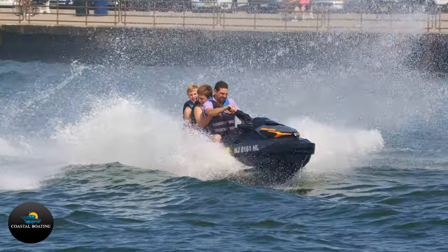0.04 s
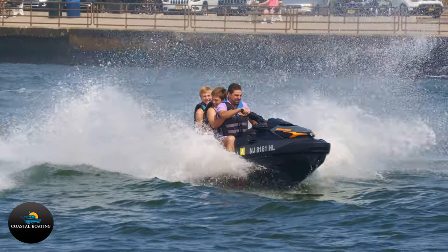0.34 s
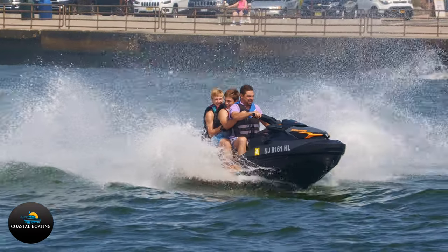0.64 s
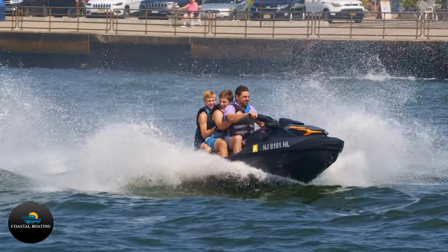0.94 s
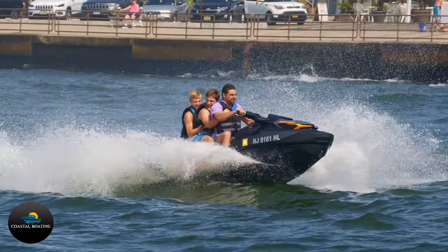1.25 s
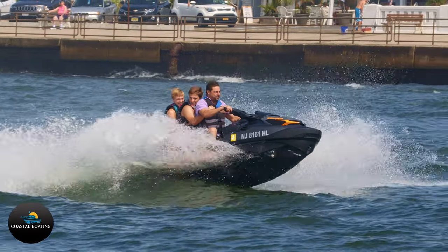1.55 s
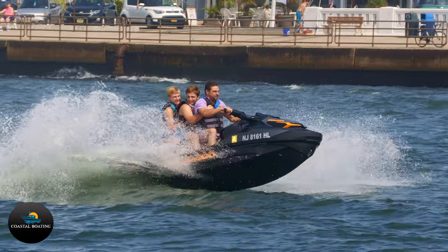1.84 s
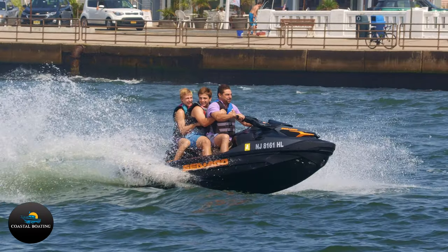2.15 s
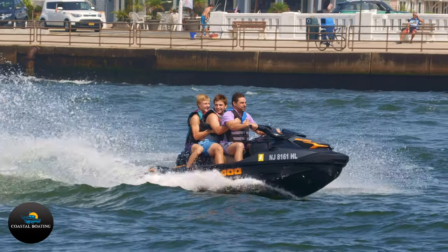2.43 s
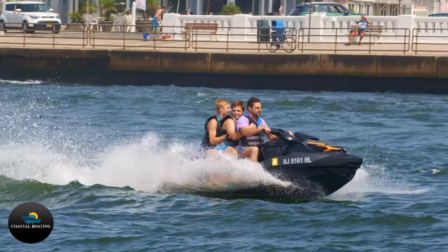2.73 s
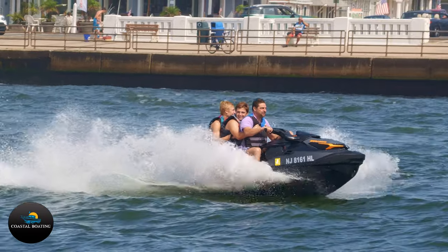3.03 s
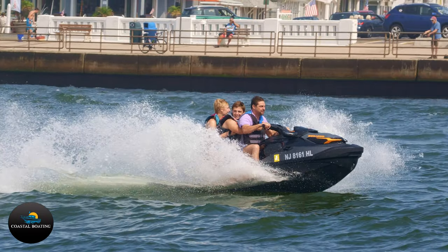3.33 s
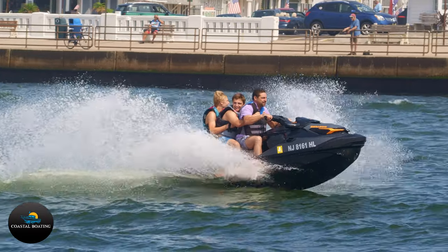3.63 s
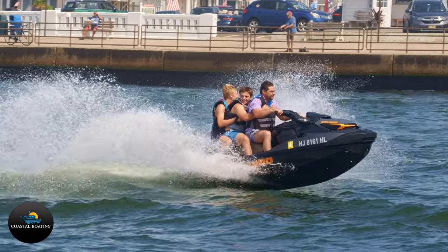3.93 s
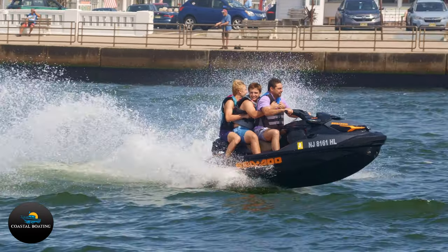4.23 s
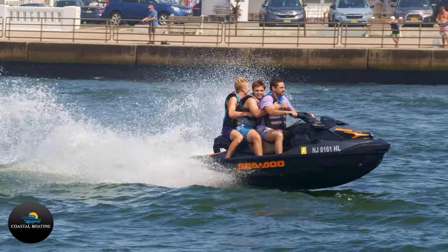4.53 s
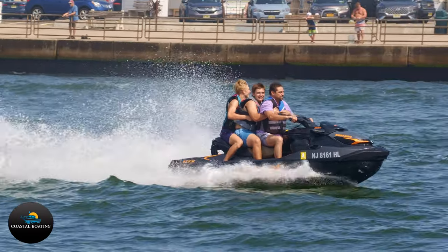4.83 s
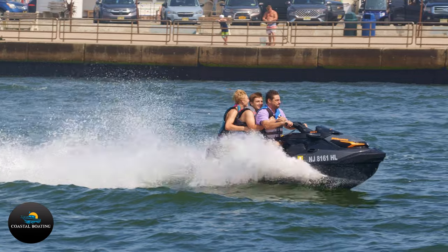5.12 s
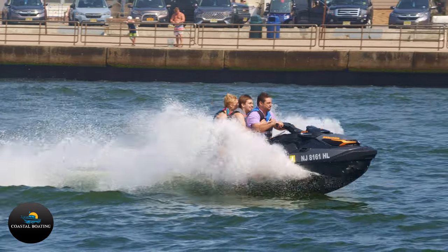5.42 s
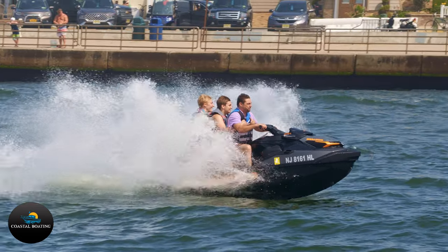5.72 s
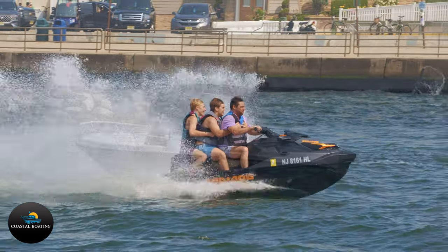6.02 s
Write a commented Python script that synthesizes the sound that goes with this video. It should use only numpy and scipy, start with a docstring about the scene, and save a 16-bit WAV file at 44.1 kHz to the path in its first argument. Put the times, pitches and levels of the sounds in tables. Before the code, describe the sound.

A personal watercraft runs along a choppy waterway, heard from the shore some way off. From the start there is a low engine drone, an uneven underwater exhaust burble and the rush of the wake, with a light hiss of spray. The engine tone comes forward at about 1.2 seconds, then swells and dips as the water surges with each wave. Its pitch creeps upward until about 5.5 seconds and sags slightly afterwards. A dull hull splash lands near 2.7 seconds. From about 3 seconds the spray becomes a louder, brighter hiss and patter. Between 3.4 and 5.3 seconds falling water makes scattered short, sharp slaps, while the hull hits the chop near 3.6 seconds and several times around 4.9 to 5.2. The drone and rushing spray continue to the end, just after 6 seconds.

```python
"""The three-cylinder engine of a personal watercraft drones along a choppy waterway, some way off.
It sounds at the crank rate and its overtones, at the firing rate and at half the firing rate, and each
firing excites resonances of hull and pump. Exhaust gas burbles out under water, and the turbulent wake
adds a low rush. The hull throws sheets of spray, whose many drop impacts brighten into a hiss and
patter; larger lumps land with a few sharp slaps, and the hull slams into the chop with duller splashes."""
import sys
import numpy as np
from scipy import signal
from scipy.fft import rfft, irfft, next_fast_len
from scipy.io import wavfile

SR = 44100
rng = np.random.default_rng(int(sys.argv[2]) if len(sys.argv) > 2 else 0)


def file_out(sig):
    """Save sig as 16-bit WAV at sys.argv[1]."""
    # one column per channel
    cols = np.atleast_2d(sig).T
    # limit, then scale
    lim = np.clip(cols, -1, 1)
    pcm = np.round(lim * 32767).astype(np.int16)
    wavfile.write(sys.argv[1], SR, pcm)


N = 271952
TIME = np.arange(N) / SR

# engine speed, rising and sagging as the hull rides the chop: time_s, rotation_hz
CRANK_SPEED = [(0, 79), (1.25, 75), (1.6, 78.6), (2.05, 78.8), (2.3, 81.4), (3.25, 84.7), (4.1, 82.3),
               (4.55, 85.2), (5.2, 86.5), (5.55, 88.7), (6.17, 81.5)]
# tone at the crank rate: time_s, level_db
CRANK_LEVEL = [(0, -42.5), (1.05, -40.5), (1.26, -23.5), (2.05, -25), (2.3, -37), (2.5, -23), (2.77, -23),
               (3.02, -43), (3.7, -42.5), (4.15, -22.5), (4.32, -33), (4.52, -18.5), (4.85, -28.5),
               (5.2, -26.5), (5.7, -35), (6.03, -22), (6.17, -32)]
# tone at the firing rate: time_s, level_db
FIRING_LEVEL = [(0, -41), (1.02, -44.5), (1.42, -28.5), (2.05, -34), (2.3, -22.5), (2.55, -26), (2.75, -37),
                (3.2, -30.5), (5.0, -28.5), (5.27, -35), (5.56, -23.5), (6.17, -35.5)]
# overtones, relative to the crank tone: harmonic_number, level_db
CRANK_HARMONICS = [(2, -13.5), (3, -21)]
# resonances of hull and jet pump: centre_hz, bandwidth_hz, level_db
HULL_RESONANCES = [(688.5, 120, -45), (1658, 220, -54)]
# exhaust gas burbling under water: time_s, level_db
BURBLE_LEVEL = [(0, -24), (0.22, -28.5), (0.65, -26.5), (1.0, -32), (1.2, -24), (1.9, -28), (2.3, -24),
                (3.05, -25.5), (3.42, -23), (3.75, -29), (5.1, -22.5), (6.17, -25.5)]
# amount of spray, of which only the swing about the mean counts: time_s, level_db
SPRAY_AMOUNT = [(0, -49), (0.8, -52), (1.8, -49.5), (2.5, -50.5), (3.25, -44), (3.8, -43), (5.2, -44),
                (5.4, -42), (6.17, -46.3)]
# spectral shapes of the four water noises: frequency_hz, relative_density_db
BURBLE_SPECTRUM = [(20, -28.5), (36, -22.5), (48, -9.5), (60, -8), (75, -2.5), (100, 2.5), (120, 0),
                   (145, -4), (185, -9.5), (260, -27.5), (400, -50)]
CHURN_SPECTRUM = [(60, -32), (110, -11), (170, 2), (250, 1), (350, -1.5), (500, -5), (700, -9), (900, -14),
                  (1300, -18.5), (2500, -33), (5000, -55.5)]
SHEET_SPECTRUM = [(200, -33.5), (500, -11.5), (850, 1.5), (1100, 1), (1600, -1), (2200, -2.5), (3000, -7),
                  (4200, -17), (7000, -40.5), (9000, -53)]
MIST_SPECTRUM = [(900, -30.5), (2200, -7.5), (3000, -2.5), (3600, -0.5), (4300, 0), (5000, -2.5),
                 (6000, -6.5), (7000, -10.5), (8000, -14), (8500, -17), (9000, -32.5)]
# waves the hull ploughs through: crest_s, half_height_width_s, churn_rise_db, sheet_rise_db
WAVE_CRESTS = [(1.445, 0.36, 4, -0.5), (1.823, .25, -0.5, 1.5), (2.374, 0.11, 4.5, -0.5),
               (2.76, 0.33, 3.5, 3), (3.418, 0.72, 3, 2), (4.263, 0.15, 2, .5), (4.673, 0.31, 3, 1.3),
               (5.01, 0.23, 5, 2.5), (5.426, 0.33, 4, 0), (6.076, 0.45, 3, 1)]
# big lumps of spray striking the surface: start_s, level_db, pitch_hz
BIG_SLAPS = [(3.716, -20, 1400), (3.742, -17, 1500), (3.760, -20.5, 1700), (3.804, -22, 2800),
             (3.826, -23, 1700), (4.0045, -16.5, 1500), (4.011, -18.5, 2200), (4.036, -23.5, 1900),
             (4.143, -24, 1900), (4.2722, -20.5, 2500), (4.409, -22.5, 2160), (4.424, -23, 1900),
             (4.762, -19, 1700), (5.141, -24.5, 1500)]
# the hull striking the chop: start_s, level_db, pitch_hz, decay_s
HULL_SLAMS = [(2.747, -16.5, 294, 0.0086), (3.566, -20, 1250, 0.017), (4.901, -23, 650, 0.0077),
              (4.942, -16.5, 1050, 0.0065), (4.986, -17.5, 950, 0.019), (5.243, -19.5, 1150, 0.0136)]
# narrow bands that colour all the water noise: centre_hz, bandwidth_hz, gain_db
WATER_BANDS = [(706, 87, -0.5), (1660, 120, 1), (2726, 83, 2.5), (3490, 73, 4)]

# base levels, and the share of the spray's swing (in dB) that each follows
CHURN_DB, CHURN_FOLLOWS = -30.5, 0.16
SHEET_DB, SHEET_FOLLOWS = -40.5, 0.83
MIST_DB = -49   # follows the whole swing
HALF_FIRING_DB, HALF_FIRING_FOLLOWS = -35, 0.39   # follows the firing tone's swing instead
SMALL_SLAPS_PER_S, SMALL_SLAP_DB, SMALL_SLAP_SPREAD_DB, SMALL_SLAP_HZ = 9.6, -29, 0.5, 2100
SLAP_DECAY_S, SLAP_DECAY_EXPONENT = 0.0013, 0.5   # decay at the mean level; its growth with amplitude


def engine_drone(crank_phase, firing_phase):
    """Periodic rotation and firing radiate tones, modulated as the exhaust outlet dips in the chop."""
    def tone(phase, level_db, flutter_db, wobble_rad):
        """One engine order under random amplitude and phase modulation."""
        amplitude = np.sqrt(2) * from_db(level_db + flutter_db * fluctuation(6.1))
        return amplitude * np.sin(phase + wobble_rad * fluctuation(7.2))

    crank_db = sampled(CRANK_LEVEL)
    half_firing_db = HALF_FIRING_DB + HALF_FIRING_FOLLOWS * swing(FIRING_LEVEL)
    drone = tone(firing_phase / 2, half_firing_db, flutter_db=2.5, wobble_rad=0.27)
    drone += tone(crank_phase, crank_db, flutter_db=-0.3, wobble_rad=0.14)
    drone += tone(firing_phase, sampled(FIRING_LEVEL), flutter_db=1.5, wobble_rad=0.052)
    for harmonic, relative_db in CRANK_HARMONICS:
        drone += tone(harmonic * crank_phase, crank_db + relative_db, flutter_db=1.0, wobble_rad=0.12)
    return drone


def hull_growl(firing_phase):
    """Forced resonance: each firing drives hull and pump with a burst of noise."""
    bursts = turbulence() * (1 + 0.97 * np.cos(firing_phase))
    return sum(from_db(level_db) * rms_one(band_pass(bursts, hz - width_hz / 2, hz + width_hz / 2))
               for hz, width_hz, level_db in HULL_RESONANCES)


def exhaust_burble():
    """Bubble noise: gas bursting out under water radiates an uneven, low rumble."""
    bubbling = shape_spectrum(turbulence(), BURBLE_SPECTRUM, flutter_db=2.0, flutter_hz=2.7)
    return from_db(sampled(BURBLE_LEVEL)) * bubbling


def wake_churn(firing_phase, spray_db, surge_db):
    """Turbulence from jet and hull gives broadband noise, pulsing a little with each firing."""
    level_db = CHURN_DB + CHURN_FOLLOWS * spray_db + surge_db
    rush = shape_spectrum(turbulence(), CHURN_SPECTRUM, flutter_db=1.07, flutter_hz=12)
    return from_db(level_db) * rush * (1 + 0.19 * np.cos(firing_phase))


def falling_spray(spray_db, surge_db):
    """Drop impacts superpose into noise; the denser the spray, the more single drops stand out."""
    grain = np.clip(0.65 + 0.045 * spray_db, 0, .95)

    def patter(per_s, spread_db=3.0):
        """Shot noise of near drops, many small and a few large, over the hiss of countless far ones."""
        sizes = from_db(spread_db * np.minimum(rng.exponential(1, N), 4))
        signs = rng.choice([-1, 1], N)
        landings = rng.random(N) < per_s / SR
        return grain * rms_one(sizes * signs * landings) + np.sqrt(1 - grain ** 2) * turbulence()

    clumps = from_db(0.64 * fluctuation(39))   # water lands in clumps, in all bands at once
    sheet = shape_spectrum(patter(per_s=2000), SHEET_SPECTRUM, flutter_db=1.0, flutter_hz=14)
    mist = shape_spectrum(patter(per_s=3200), MIST_SPECTRUM, flutter_db=0.37, flutter_hz=4.7)
    sheet_db = SHEET_DB + SHEET_FOLLOWS * spray_db + surge_db
    return clumps * (from_db(sheet_db) * sheet + from_db(MIST_DB + spray_db) * mist)


def spray_slaps(first_s, last_s):
    """Brief impacts sound bright; bigger lumps take longer. Small ones fall from first_s to last_s."""
    count = round(SMALL_SLAPS_PER_S * (last_s - first_s))
    small = [(rng.uniform(first_s, last_s), rng.normal(SMALL_SLAP_DB, SMALL_SLAP_SPREAD_DB),
              SMALL_SLAP_HZ) for _ in range(count)]
    impacts = np.vstack([BIG_SLAPS, small])
    level_db = impacts[:, 1]
    decays_s = SLAP_DECAY_S * from_db(level_db - level_db.mean()) ** SLAP_DECAY_EXPONENT
    return water_impacts(impacts, decays_s, snap=1.3, tail_s=.014, tail_db=-18, edge_ratio=1.84)


def hull_slams():
    """Contact time limits bandwidth: the hull's broad, soft landings carry little treble."""
    rows = np.array(HULL_SLAMS)
    hits = water_impacts(rows[:, :3], rows[:, 3], snap=1.0, tail_s=.022, tail_db=-23.5, edge_ratio=1.97)
    return band_pass(hits, low_hz=80, high_hz=4820)


def water_impacts(impacts, decays_s, snap, tail_s, tail_db, edge_ratio):
    """Impact transients: an impulse, a crackle and a fizzing tail, in a band around each pitch."""
    out, t = np.zeros(N), np.arange(SR // 8) / SR
    for (start_s, level_db, pitch_hz), decay_s in zip(impacts, decays_s):
        envelope = np.exp(-t / decay_s) + from_db(tail_db) * np.exp(-t / tail_s)
        force = snap * (t == 0) + envelope * rng.standard_normal(len(t))
        hit = band_pass(force, pitch_hz / edge_ratio, pitch_hz * edge_ratio)
        at = round(start_s * SR)
        out[at:at + len(t)] += from_db(level_db) * hit / np.abs(hit).max()
    return out


def wave_surges():
    """Slow modulation: each wave shifts the levels of churn and sheets by a Gaussian pulse in dB."""
    return sum(np.outer(rises_db, .5 ** ((2 * (TIME - crest_s) / width_s) ** 2))
               for crest_s, width_s, *rises_db in WAVE_CRESTS)


def water_colour(x):
    """Resonant filters raise or lower a few narrow bands."""
    for hz, width_hz, gain_db in WATER_BANDS:
        resonator = signal.iirpeak(hz, hz / width_hz, fs=SR)
        x = x + (from_db(gain_db) - 1) * signal.lfilter(*resonator, x)
    return x


def shape_spectrum(source, spectrum, flutter_db, flutter_hz):
    """Spectral shaping, with independent modulation of overlapping half-octave bands; unit rms."""
    hz, level_db = np.transpose(spectrum)
    size = next_fast_len(N)
    octave = np.log2(np.maximum(np.fft.rfftfreq(size, 1 / SR), 1))
    shaped = rfft(source, size) * from_db(np.interp(octave, np.log2(hz), level_db))
    out = np.zeros(N)
    for centre in np.arange(np.log2(hz[0]), np.log2(hz[-1]) + .5, .5):
        share = np.maximum(1 - 2 * np.abs(octave - centre), 0)
        out += irfft(shaped * share, size)[:N] * from_db(flutter_db * fluctuation(flutter_hz))
    return rms_one(out)


def fluctuation(rate_hz):
    """Random modulation of unit rms: noise low-passed at about rate_hz."""
    step, settle = 40, 2000   # samples per control point; points dropped while the filter settles
    pole = np.exp(-2 * np.pi * rate_hz * step / SR)
    noise = rng.standard_normal(N // step + settle + 2)
    slow = signal.lfilter([1], [1, -2 * pole, pole * pole], noise)[settle:]
    return np.interp(np.arange(N) / step, np.arange(len(slow)), rms_one(slow))


def turbulence():
    """Plain white noise."""
    return rng.standard_normal(N)


def band_pass(x, low_hz, high_hz):
    """Butterworth band-pass."""
    return signal.sosfilt(signal.butter(2, [low_hz, high_hz], "band", fs=SR, output="sos"), x)


def sampled(rows):
    """Linear interpolation of a time table at every sample."""
    return np.interp(TIME, *np.transpose(rows))


def swing(rows):
    """Deviation of a level curve from its mean, in dB."""
    level_db = sampled(rows)
    return level_db - level_db.mean()


def from_db(db):
    """Decibels to gain."""
    return 10 ** (np.asarray(db) / 20)


def rms_one(x):
    """Scale to unit rms."""
    return x / np.sqrt(np.mean(x ** 2) + 1e-20)


def scene():
    """Superposition of engine, wake and spray, heard from the shore."""
    crank_phase = 2 * np.pi * np.cumsum(sampled(CRANK_SPEED)) / SR
    firing_phase = 1.5 * crank_phase   # three cylinders fire once each in two turns
    spray_db = swing(SPRAY_AMOUNT)
    churn_surge_db, sheet_surge_db = wave_surges()
    engine = engine_drone(crank_phase, firing_phase) + hull_growl(firing_phase)
    water = exhaust_burble() + wake_churn(firing_phase, spray_db, churn_surge_db)
    water += falling_spray(spray_db, sheet_surge_db)
    water += hull_slams() + spray_slaps(first_s=3.4, last_s=5.35)
    return (engine + water_colour(water))[None]


def record(dry):
    """Band limiting: the deepest bass is cut; the treble rolls off, then ends steeply."""
    low_cut = signal.butter(2, 21, "high", fs=SR, output="sos")
    roll_off = signal.butter(8, 7900, fs=SR, output="sos")
    top_cut = signal.ellip(10, .3, 90, 8700, fs=SR, output="sos")
    return signal.sosfilt(np.vstack([low_cut, roll_off, top_cut]), dry)


dry = scene()
out = record(dry)
file_out(out)
```